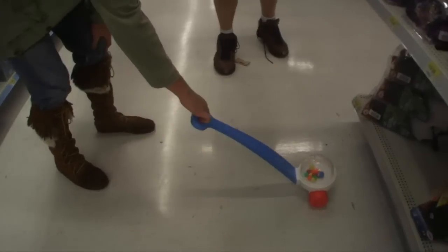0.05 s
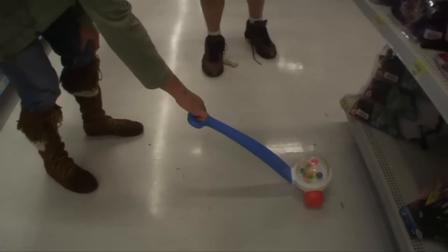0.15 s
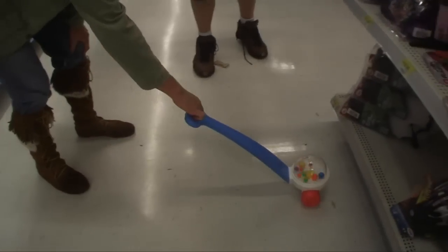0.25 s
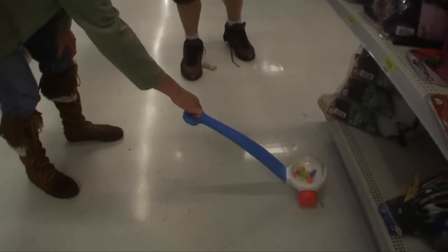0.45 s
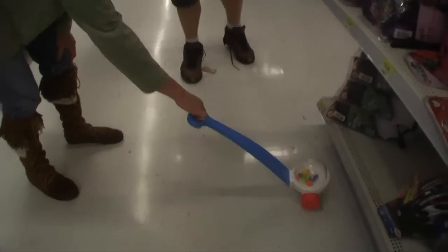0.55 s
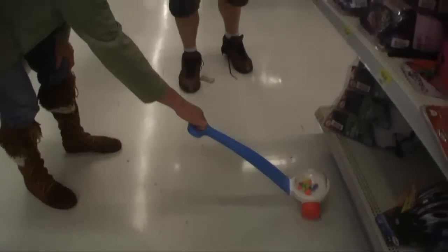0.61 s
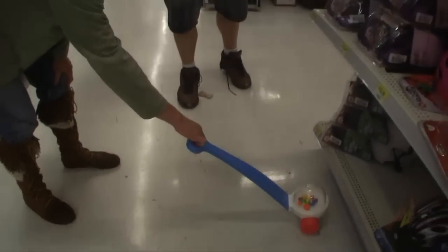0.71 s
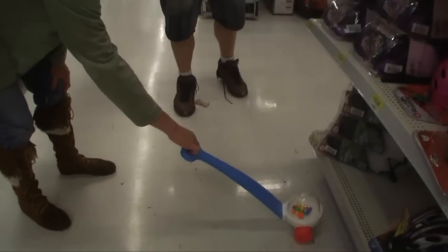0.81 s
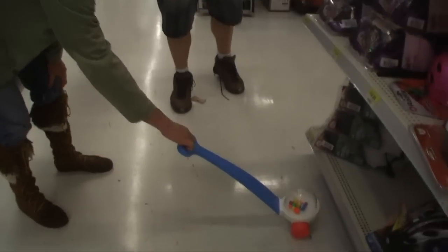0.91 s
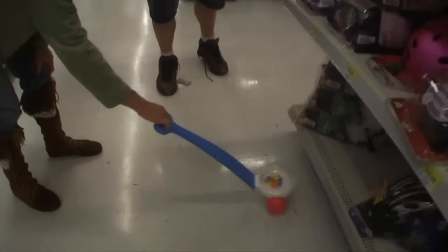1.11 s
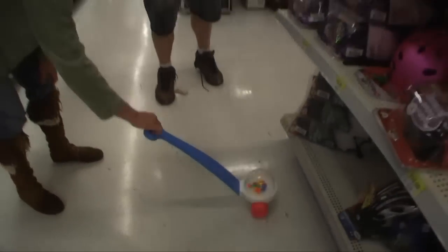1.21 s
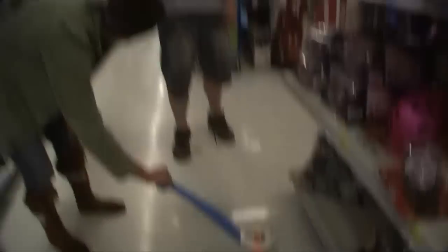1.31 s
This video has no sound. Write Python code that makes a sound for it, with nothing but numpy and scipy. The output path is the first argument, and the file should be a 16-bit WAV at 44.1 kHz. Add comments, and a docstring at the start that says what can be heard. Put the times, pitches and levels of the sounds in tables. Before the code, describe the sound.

A toddler's push toy snaps once, its plastic balls clattering inside a dome as it rolls.

```python
"""Plastic balls clatter in the clear dome of a push toy rolling over a hard shop floor.
Its sprung piston snaps once and throws them against the dome; they bounce lower,
then jostle and roll in the bowl while the wheels turn.
Floor and shelves throw back quick echoes; the shop adds a soft tail and a steady hush."""
import sys
import numpy as np
from scipy import signal
from scipy.fft import rfft, irfft
from scipy.io import wavfile
from scipy.ndimage import uniform_filter1d

SR = 44100
rng = np.random.default_rng(int(sys.argv[2]) if len(sys.argv) > 2 else 0)


def materialize(psi):
    """Save the field psi as 16-bit PCM at rate SR to the path in sys.argv[1].

    A 1-D psi becomes a single channel; in a 2-D psi each row is a channel.
    """
    bounded = np.clip(np.atleast_2d(psi).T, -1, 1)
    quanta = np.round(bounded * 32767).astype(np.int16)
    wavfile.write(sys.argv[1], SR, quanta)


N = 59535
TIME_S = np.arange(N) / SR
EVENT_S = TIME_S[:8192]

# ball knocks, some followed about 9 ms later by their echo: start_s, level_db, treble_db, crown_db
BALL_KNOCKS = [(.0212, -17.5, -12, -16), (.0285, -22.5, -7, 1), (.05, -33, 1.5, 3.5), (.2578, -7.5, 2, 6),
               (.2665, -25, -5, 3), (.285, -25, 8.5, 9), (.3035, -29, 10.5, 10), (.307, -21.5, 7, 9),
               (.3295, -12, 3.5, -7.5), (.338, -18, 6, -14), (.352, -38, 5, -16), (.374, -26.5, 6.5, -8),
               (.393, -26, 4.5, -1), (.435, -29, 2, -7), (.4445, -28.5, 2, 1.5), (.455, -24.5, 3, 2.5),
               (.4932, -22, -0.5, 0), (.511, -25, -1, -7), (.531, -26.5, -2.5, 4), (.5495, -18.5, -2.5, 0),
               (.629, -30.5, -4.5, 1.5), (.652, -31.5, -14, 5), (.741, -37.5, -9.5, 12),
               (.806, -31, -20.5, 10.5), (.858, -28.5, -14, -2), (.964, -38, -1, -12), (.987, -36.5, -3, 6),
               (.996, -38, -2, -2), (1.1, -32, -18, 0)]
# brightening with hardness: freq_hz, treble_multiplier
TREBLE_TILT = [(1100, 0), (2100, 0.71), (4000, 1.5), (16000, 2.5)]
# dome resonances: pitch_hz, level_db, t60_s
DOME_MODES = [(467, -24.5, 0.22), (558.2, -15.5, 0.24), (710, -17.5, 0.15), (1095, -3.5, 0.087),
              (1390, -1, 0.056), (1810, -6.5, 0.017), (2009, -5.5, 0.041), (2157, -2.5, 0.035),
              (2914, -17.5, 0.079)]
# shell's overlapping modes: freq_hz, level_db
SHELL_SPECTRUM = [(300, -10.5), (510, 2.5), (650, -17), (840, -21), (1070, 8.5), (1350, -3), (1600, -1),
                  (2120, 4.5), (3300, -7.5), (4700, -8), (6900, -11.5), (8300, -19.5), (12000, -23.5),
                  (15000, -41.5)]
DOME_DB, SPOT_SPREAD_DB, SPOT_DETUNE_RATIO = -8.5, 3.5, 0.023
SHELL_DB, SHELL_RISE_S, SHELL_T60_S, TICK_DB, TICK_T60_S = -9.5, 0.00081, 0.094, -6, 0.014
CROWN_HZ, CROWN_WIDTH_HZ = 2000, 420

# piston slams up, drops back: start_s, thump_db, crack_db
PISTON_SNAPS = [(0.2271, -9.5, -10.5), (.309, -23, -63)]
# piston and housing resonances: pitch_hz, level_db, t60_s
HOUSING_MODES = [(248, -18.5, 0.36), (504, -2, 0.035), (564, -2, 0.021), (768, -3, 0.027),
                 (860, -7.5, 0.049), (1019, 4, 0.032)]
# piston crack: freq_hz, level_db
CRACK_SPECTRUM = [(170, -14), (500, 1.5), (1200, 1), (2200, -3.5), (3500, -8.5), (6500, -8), (8500, -14.5),
                  (12000, -15), (16000, -31)]
CRACK_RISE_S, CRACK_T60_S, SLIP_S, SLIP_DB = 0.00072, 0.12, 0.0075, -8.5

# rolling loudness: time_s, level_db
ROLL_ENVELOPE = [(0, -44.5), (.06, -36.5), (.17, -47.5), (.2, -57), (.45, -39.5), (.68, -41), (.85, -47.5),
                 (.895, -75), (.97, -48.5), (1.1, -72), (1.14, -46), (1.2, -44), (1.26, -45), (1.35, -57.5)]
# hollow body's response: freq_hz, level_db
ROLL_SPECTRUM = [(150, -46), (330, -13.5), (480, -4), (680, -12.5), (830, -15.5), (1020, 3.5), (1380, -3),
                 (1580, -11.5), (2150, -12), (3100, -29), (14000, -42.5)]
# bowl tones: start_s, length_s, pitch_hz, level_db
BOWL_WHIRRS = [(.62, 0.1, 457.5, -42.5), (1.155, 0.049, 1394, -41.5)]

# thin high ticks: start_s, level_db
HIGH_TICKS = [(.724, -52), (.992, -46.5), (1.063, -40.5)]
# hiss loudness: time_s, level_db
HISS_ENVELOPE = [(0, -64.5), (.2, -53), (.8, -80), (1.15, -60.5), (1.35, -77)]
# hiss colour: freq_hz, level_db
HISS_SPECTRUM = [(2000, -15), (11500, -12), (14800, -19)]

# floor and shelf reflections: delay_s, gain
NEAR_ECHOES = [(.0046, 0.067), (.0088, 0.3)]
# shop reverb decay: freq_hz, t60_s
TAIL_DECAY = [(200, 0.19), (500, 0.7), (1100, 0.71), (2200, 0.7), (12000, 0.26)]
# shop reverb colour: freq_hz, level_db
TAIL_SPECTRUM = [(200, -7), (500, -2), (1100, -8.5), (12000, -3.5)]
# shop background: freq_hz, level_db
HUSH_SPECTRUM = [(25, -25), (60, -15.5), (190, -8), (310, -13), (450, -5.5), (780, -15.5), (1050, -10.5),
                 (2100, -19.5), (12500, -30.5), (15000, -61)]
# left-right likeness: freq_hz, correlation
MIC_CORRELATION = [(50, 0.77), (400, 0.89), (2000, 0.82), (4000, 0.65), (12000, 0.32)]
# microphone imbalance: freq_hz, left_minus_right_db
MIC_BALANCE = [(250, 2), (1000, 0)]


def balls():
    """Ball knocks and a few quick echoes: tick, dome ring, crown clack; hard knocks are brighter."""
    out, t = np.zeros((2, N)), EVENT_S
    envelope = amp(SHELL_DB) * ring(t, SHELL_RISE_S, SHELL_T60_S)
    envelope += amp(TICK_DB) * ring(t, rise_s=0.00042, t60_s=TICK_T60_S)
    crown = signal.iirpeak(CROWN_HZ, CROWN_HZ / CROWN_WIDTH_HZ, fs=SR)
    for start_s, level_db, treble_db, crown_db in BALL_KNOCKS:
        dome = np.zeros(len(t))
        for hz, db, t60_s in DOME_MODES:
            strength, detune, polarity = rng.standard_normal(3)
            mode_db = db + SPOT_SPREAD_DB * strength + treble_db * at_hz(TREBLE_TILT, hz)
            dome += np.sign(polarity) * mode(hz * (1 + SPOT_DETUNE_RATIO * detune), mode_db, t60_s)
        knock = amp(DOME_DB) * dome + envelope * noise(SHELL_SPECTRUM, treble_db)
        clack = signal.lfilter(*crown, knock)
        add(out, start_s, amp(level_db) * (knock + (amp(crown_db) - 1) * clack))
    return out


def piston():
    """The piston slides with a short scrape, then slams: a hollow thump and a crack."""
    out, t = np.zeros((2, N)), EVENT_S
    thump = sum(mode(hz, db, t60_s) for hz, db, t60_s in HOUSING_MODES)
    for start_s, thump_db, crack_db in PISTON_SNAPS:
        crack = noise(CRACK_SPECTRUM) * ring(t, CRACK_RISE_S, CRACK_T60_S)
        scrape = noise(CRACK_SPECTRUM, treble_db=-12.5) * (t < SLIP_S) * t / SLIP_S
        add(out, start_s, amp(thump_db) * thump + amp(crack_db) * crack)
        add(out, start_s - SLIP_S, amp(crack_db + SLIP_DB) * scrape)
    return out


def rolling(bumps_per_s=1000, spread_db=2):
    """Wheels and loose balls feed tiny soft bumps into the hollow body."""
    bumps = (rng.random((2, N)) < bumps_per_s / SR) * rng.choice([-1, 1], (2, N))
    strength = amp(spread_db * rng.standard_normal((2, N)))
    return unit(shaped(bumps * strength, ROLL_SPECTRUM)) * gain_curve(ROLL_ENVELOPE)


def whirrs(wobble_ratio=0.0062):
    """A wavering bowl tone swells and fades under a circling ball."""
    out = np.zeros((2, N))
    for start_s, length_s, pitch_hz, level_db in BOWL_WHIRRS:
        t = TIME_S[:round(length_s * SR)]
        wobble = unit(uniform_filter1d(rng.standard_normal(N), size=300))[:len(t)]
        phase_rad = 2 * np.pi * np.cumsum(pitch_hz * (1 + wobble_ratio * wobble)) / SR
        swell = np.sin(np.pi * t / length_s)
        add(out, start_s, amp(level_db) * swell * np.sin(phase_rad))
    return out


def radiate(x, cutoff_hz=353, leak_gain=0.0089):
    """The small plastic body gives off almost no bass."""
    highpass = signal.butter(4, cutoff_hz, "high", fs=SR, output="sos")
    return signal.sosfilt(highpass, x) + leak_gain * x


def aisle(dry):
    """Near echoes off floor and shelves, then the shop's diffuse tail."""
    near = dry.copy()
    for delay_s, gain in NEAR_ECHOES:
        add(near, delay_s, gain * dry)
    white = noise([(20, 0), (20000, 0)], size=SR)
    hz, t, bands = signal.stft(white, SR, nperseg=256)
    t60_s = at_hz(TAIL_DECAY, hz)[:, None]
    energy_norm = np.sqrt(2 * np.log(1000) / (t60_s * SR))
    bands *= ring(t, rise_s=0.0038, t60_s=t60_s) * energy_norm
    bands *= amp(at_hz(TAIL_SPECTRUM, hz))[:, None]
    tail = signal.istft(bands, SR, nperseg=256)[1]
    return near + signal.fftconvolve(dry, tail, axes=1)[:, :N]


def fizz(tick_hz=11700, width_hz=870):
    """A faint high hiss comes and goes, with a few thin ticks."""
    out = noise(HISS_SPECTRUM, size=N) * gain_curve(HISS_ENVELOPE)
    band = signal.iirpeak(tick_hz, tick_hz / width_hz, fs=SR)
    for start_s, level_db in HIGH_TICKS:
        tick = unit(signal.filtfilt(*band, rng.standard_normal((2, len(EVENT_S)))))
        add(out, start_s, amp(level_db) * tick * ring(EVENT_S, SHELL_RISE_S, t60_s=0.016))
    return out


def hush(level_db=-54):
    """Steady shop background."""
    return amp(level_db) * noise(HUSH_SPECTRUM, size=N)


def amp(db):
    """Decibels to gain."""
    return 10 ** (np.asarray(db) / 20)


def unit(x):
    """Scales to rms 1."""
    return x / np.sqrt(np.mean(x ** 2) + 1e-20)


def at_hz(table, hz):
    """Table lookup on a log-frequency axis."""
    freq_hz, value = np.transpose(table)
    return np.interp(np.log(hz + 1), np.log(freq_hz + 1), value)


def gain_curve(envelope):
    """Gain per sample from time_s, level_db points."""
    return amp(np.interp(TIME_S, *np.transpose(envelope)))


def add(mix, start_s, sound):
    """Mixes a sound in at start_s."""
    part = mix[:, max(round(start_s * SR), 0):][:, :sound.shape[-1]]
    part += sound[..., :part.shape[1]]


def mode(hz, db, t60_s):
    """Damped sine."""
    return amp(db) * 1000 ** (-EVENT_S / t60_s) * np.sin(2 * np.pi * hz * EVENT_S)


def ring(t, rise_s, t60_s):
    """Quick rise, exponential fall."""
    return (1 - np.exp(-t / rise_s)) * 1000 ** (-t / t60_s)


def shaped(white, spectrum, treble_db=0):
    """Colours two independent signals and sets their left-right correlation."""
    hz = np.fft.rfftfreq(white.shape[1], 1 / SR)
    correlation = at_hz(MIC_CORRELATION, hz)
    mid, side = rfft(white) * np.sqrt([(1 + correlation) / 2, (1 - correlation) / 2])
    gain = unit(amp(at_hz(spectrum, hz))) * amp(treble_db * at_hz(TREBLE_TILT, hz))
    return irfft(np.array([mid + side, mid - side]) * gain, white.shape[1])


def noise(spectrum, treble_db=0, size=len(EVENT_S)):
    """Coloured stereo noise."""
    return shaped(rng.standard_normal((2, size)), spectrum, treble_db)


def scene():
    """The toy in the aisle, over the shop's hush."""
    toy = radiate(piston() + balls() + rolling() + whirrs())
    return aisle(toy) + fizz() + hush()


def record(dry):
    """Slightly unequal microphones, full-scale clipping, 15.4 kHz band limit."""
    lean_db = at_hz(MIC_BALANCE, np.fft.rfftfreq(N, 1 / SR)) / 2
    heard = irfft(rfft(dry) * amp([lean_db, -lean_db]), N)
    lowpass = signal.firwin(255, 15400, window=("kaiser", 9), fs=SR)
    return signal.oaconvolve(np.clip(heard, -1, 1), lowpass[None], "same", axes=1)


dry = scene()
out = record(dry)
materialize(out)
```